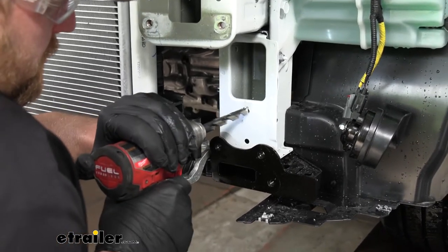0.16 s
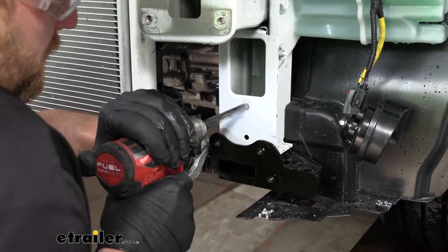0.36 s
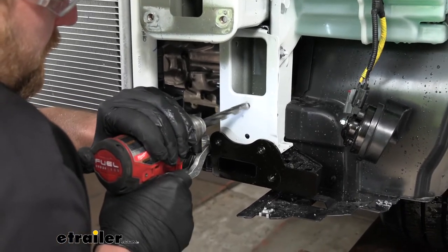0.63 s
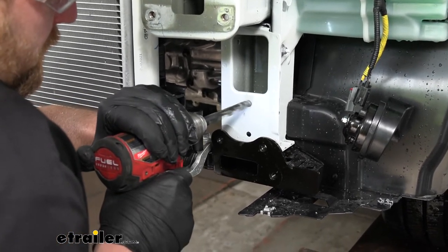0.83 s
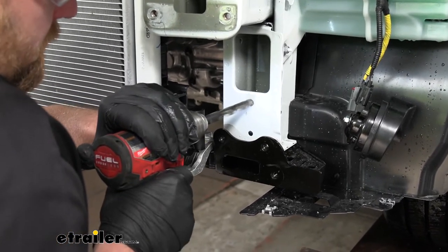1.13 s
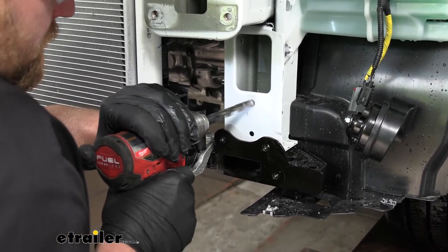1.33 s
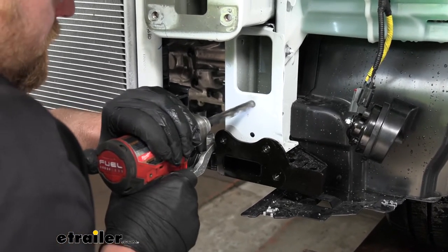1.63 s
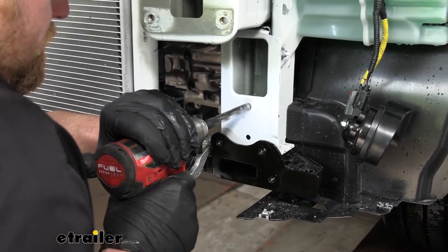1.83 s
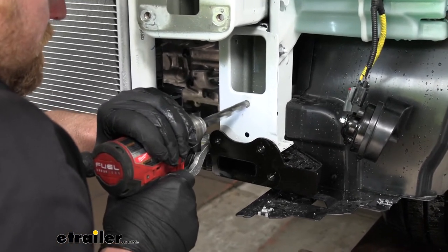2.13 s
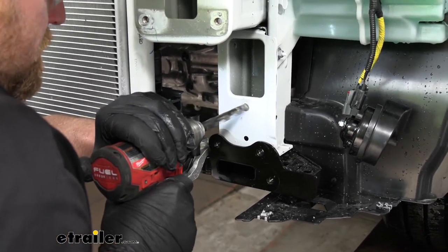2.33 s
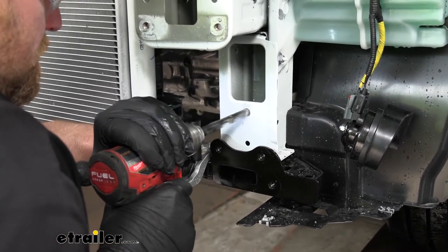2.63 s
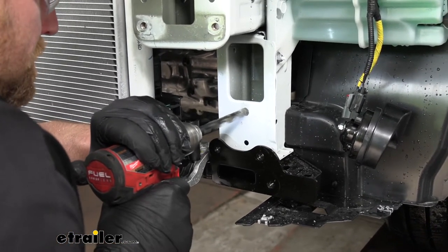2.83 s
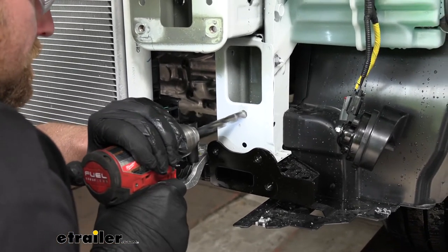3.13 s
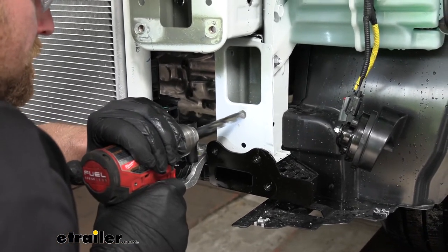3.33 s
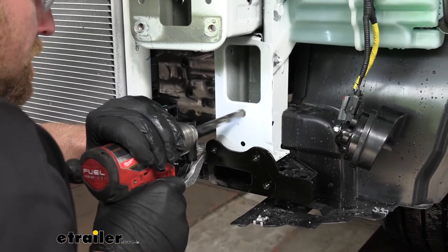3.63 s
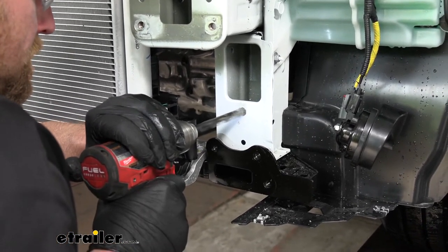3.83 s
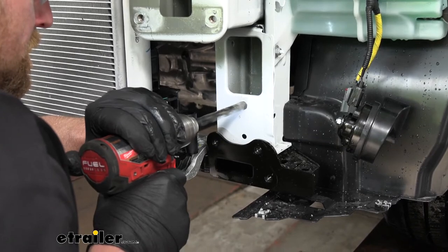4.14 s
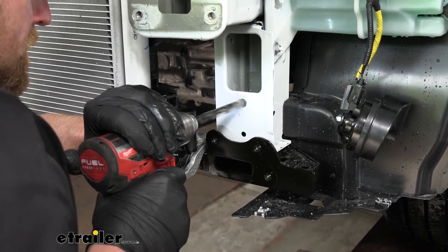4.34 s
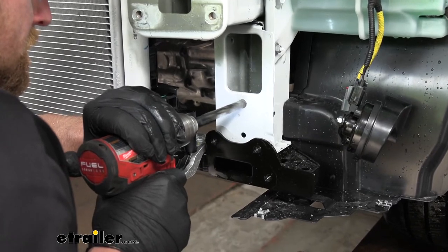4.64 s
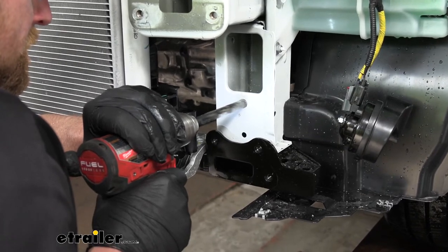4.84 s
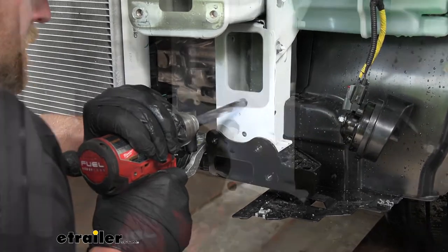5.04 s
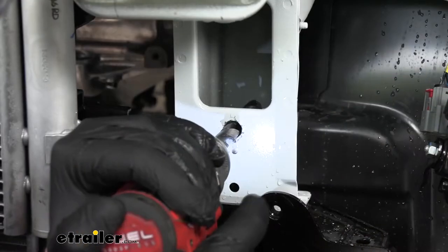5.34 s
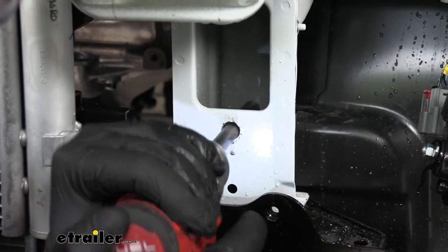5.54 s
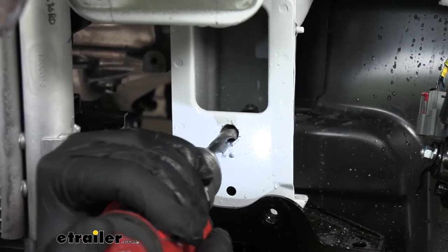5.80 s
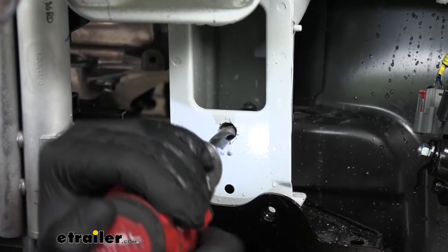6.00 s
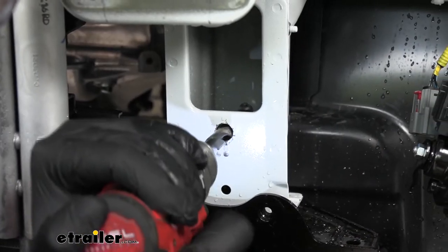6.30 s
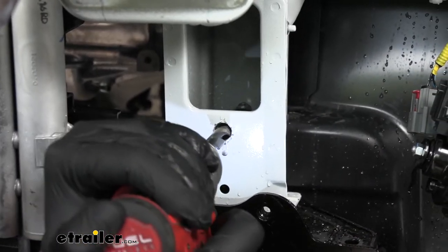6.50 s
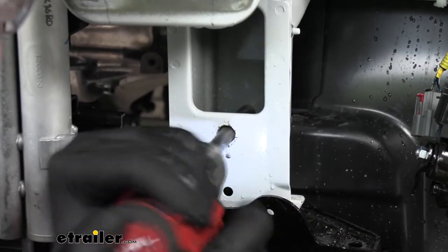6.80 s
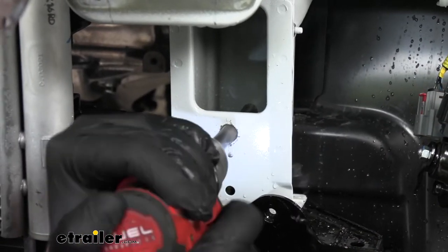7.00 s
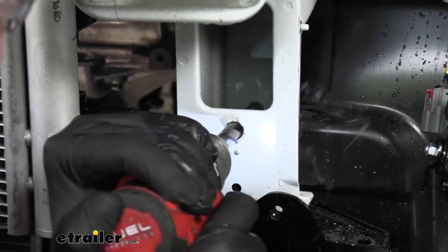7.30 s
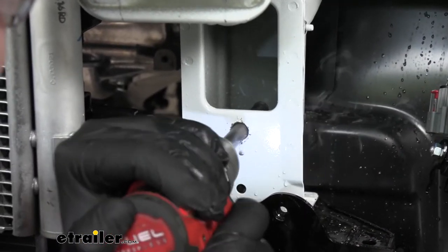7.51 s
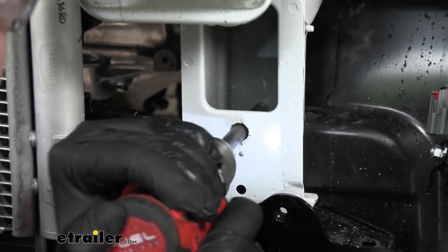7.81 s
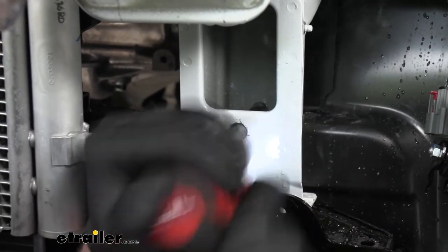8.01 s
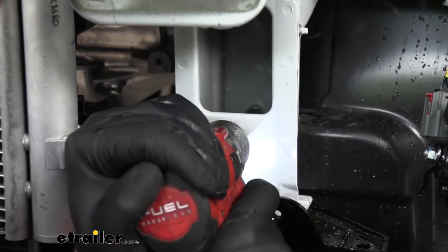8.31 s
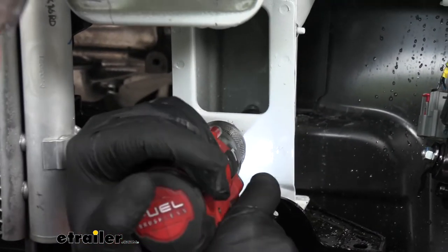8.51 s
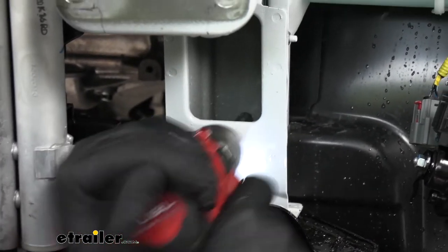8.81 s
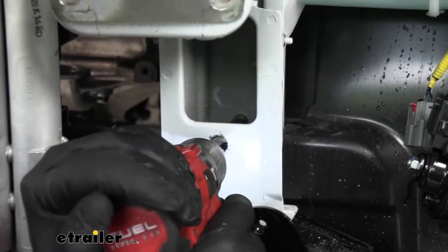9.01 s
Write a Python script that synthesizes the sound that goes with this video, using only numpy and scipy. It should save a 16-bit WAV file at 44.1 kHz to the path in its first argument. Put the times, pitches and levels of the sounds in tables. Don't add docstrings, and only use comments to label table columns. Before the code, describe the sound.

Steel drilling with a handheld electric drill. First a brief buzz, then over four seconds of rough, shrill boring with irregular metallic catches and a thin high electronic singing. After an abrupt change to a close microphone, the bit bites violently, knocks and scrapes the hole rim, pauses among small ticks, then jerks through four short bursts with clanks, gear clicks and crackling gloves, over quiet workshop air.

```python
import sys
import numpy as np
from scipy import signal
from scipy.fft import rfft, irfft
from scipy.io import wavfile
from scipy.ndimage import uniform_filter1d

SR = 44100
rng = np.random.default_rng(int(sys.argv[2]) if len(sys.argv) > 2 else 0)


def volts_from_decibels(level):
    exponent = np.asarray(level, float) / 20
    return 10 ** exponent


def to_wav(s):
    ch = np.atleast_2d(s).T
    pcm = np.round(np.clip(ch, -1, 1) * 32767)
    wavfile.write(sys.argv[1], SR, pcm.astype(np.int16))


N = 403515
T = np.arange(N) / SR
MOVE_S = 5.46
MOVE = int(MOVE_S * SR)
AFAR = T < MOVE_S

# bit bites t/s, lets go t/s, gear and chip noise at the bite level/dB, settled level/dB,
# coast-down dB/s
CUTS = [
    (-.3, -.02, -31, -33, 200),
    (.263, .49, -12, -16, 90),
    (.702, 5.24, -14, -21, 40),
    (5.525, 5.67, -3, -24, 480),
    (6.782, 7.18, -5.5, -25, 80),
    (7.488, 7.632, -14, -23, 300),
    (7.85, 8.172, -15.5, -27, 800),
    (8.812, 9.04, -16.5, -26, 150),
]
# t/s, peak level/dB, f/Hz
CATCHES = [(0.9455, -9, 3550), (1.162, -12, 3710), (1.374, -13, 3740), (1.4868, -14, 3110),
           (1.5237, -12, 3800), (1.5791, -11, 3610), (1.6205, -13, 3590), (1.6544, -12, 3630),
           (1.809, -13, 3730), (1.9248, -12, 3710), (2.056, -12, 3770), (2.1049, -12, 3690),
           (2.2166, -15, 3690), (2.26, -11, 3170), (2.3269, -7, 3420), (2.4586, -12, 3170),
           (2.5962, -12, 3700), (2.6546, -12, 3530), (2.719, -13, 3670), (2.8741, -12, 3680),
           (2.9031, -13, 3450), (3.2448, -12, 3780), (3.4503, -14, 3800), (3.5206, -9, 3420),
           (3.6479, -14, 3750), (3.7831, -10, 3750), (3.8364, -13, 3180), (3.8654, -14, 3320),
           (3.9312, -7, 3410), (4.0295, -10, 3590), (4.0794, -11, 3430), (4.1293, -9, 3600),
           (4.1816, -13, 3730), (4.2305, -12, 3090), (4.2929, -14, 3730), (4.3298, -7, 3690),
           (4.5079, -9, 3480), (4.6032, -12, 3770), (4.6361, -9, 3110), (4.674, -10, 3590),
           (4.7104, -9, 3720), (4.7613, -9, 3750), (4.8137, -12, 3580), (4.8406, -8, 3710),
           (4.915, -11, 3690), (4.9424, -10, 3780), (5.0172, -8, 3490), (5.0547, -14, 3740),
           (5.1001, -12, 3110), (5.1973, -13, 3690)]


def unit(x):
    return x / np.sqrt(np.mean(x ** 2))


def noise():
    return rng.standard_normal(N)


def walk(rate):
    steps = rng.standard_normal(int(4 * rate * N / SR) + 9)
    smooth = 2.4 * uniform_filter1d(uniform_filter1d(steps, size=4), size=4)
    return np.interp(T, np.arange(len(steps)) / (4 * rate), smooth)


def colour(x, shape, peaks=(), lo_hz=1., hi_hz=30000.):
    f = np.arange(4097) * SR / 8192 + 1
    shape_hz, shape_db = np.transpose(shape)
    db = np.interp(np.log(f), np.log(shape_hz), shape_db)
    for hz, width, rise_db in peaks:
        db = db + 10 * np.log10(1 + (volts_from_decibels(rise_db) ** 2 - 1) / (1 + (2 * (f - hz) / width) ** 2))
    db = db - 10 * np.log10((1 + (lo_hz / f) ** 8) * (1 + (f / hi_hz) ** 8))
    cep = irfft(db * np.log(10) / 20)
    cep = np.r_[cep[0], 2 * cep[1:4096], np.zeros(4096)]
    response = irfft(np.exp(rfft(cep)))[:4096]
    return unit(signal.oaconvolve(x, response)[:len(x)])


def grit(count, rate, scatter_db, smooth):
    hit = rng.random(count) < rate / SR
    size = rng.exponential(size=count)
    hits = hit * rng.standard_normal(count) * volts_from_decibels(scatter_db * np.minimum(size, 4))
    return unit(unit(hits) + smooth * rng.standard_normal(count))


def add(out, s, sound):
    i = int(s * SR)
    out[i:i + len(sound)] += sound[:N - i]


def spans(rows, soft):
    gain = np.zeros(N)
    for on, off, db0, db1 in rows:
        part = slice(int(on * SR), int(off * SR))
        gain[part] = volts_from_decibels(np.linspace(db0, db1, len(gain[part])))
    return uniform_filter1d(gain, int(soft * SR))


def swell(t, rise, t60):
    attack = np.sin(np.pi / 2 * np.minimum(t / rise, 1)) ** 2
    return attack * volts_from_decibels(-60 * np.maximum(t - rise, 0) / max(t60, .005))


def tones(phase, orders, wobble_db, rate, tilt_db=0):
    return sum(volts_from_decibels(db + tilt_db * np.log2(k / 4) + wobble_db * walk(rate)) * np.sin(k * phase + k * k)
               for k, db in orders)


def shop():
    # f/Hz, level/dB per Hz
    air_afar = [(18, -37.5), (30, -8.5), (198, -6), (391, -15.5), (508, -22), (677, -12.5), (814, -24),
                (1740, -23), (2710, -28), (9800, -40.5), (15700, -62)]
    air_close = [(18, -39), (30, -14), (111, -0.5), (208, -8.5), (293, -5), (343, -14), (457, -9),
                 (594, -14.5), (8370, -36), (13800, -35), (15700, -44)]
    air = noise() * volts_from_decibels(1.0 * walk(4.08))
    return np.r_[volts_from_decibels(-45) * colour(air[:MOVE], air_afar), volts_from_decibels(-46.5) * colour(air[MOVE:], air_close)]


def room(x):
    t = T[:SR // 2]
    dull = uniform_filter1d(rng.standard_normal(len(t)), size=6) * volts_from_decibels(-60 * t / 0.81)
    bright = rng.standard_normal(len(t)) * volts_from_decibels(-4.0 - 60 * t / .5)
    tail = (dull + bright) * (t > .008)
    return signal.oaconvolve(x, tail / np.sqrt(np.sum(tail ** 2)))[:N]


def rustle():
    crackle_spans = [(.52, .577, -39, -39), (.577, .7, -60, -62), (5.53, 5.56, -40, -32),
                     (5.56, 5.68, -29, -27), (6.78, 6.95, -38, -36), (6.95, 7.15, -32, -34),
                     (7.15, 7.34, -41, -48), (7.5, 7.65, -41, -39), (7.9, 8.1, -40, -42),
                     (8.95, 9.1, -38, -36), (5.68, 6.02, -56, -62), (6.04, 6.16, -61, -62),
                     (6.36, 6.6, -64, -66), (8.38, 8.42, -62, -62), (8.48, 8.62, -62, -66)]
    grains = grit(N, 900, 3.0, .8) * volts_from_decibels(3.5 * walk(40))
    crackle = colour(grains, [(3000, -14), (9000, -12), (12500, -9), (14000, 0)], (), 4000.)
    return spans(crackle_spans, .02) * crackle


def clicks():
    # t/s, peak level/dB, from f/Hz, to f/Hz
    chips = [(.023, -30, 1500, 13000), (.165, -38, 4500, 15500), (.575, -30, 3000, 15000),
             (5.383, -40, 12500, 15500), (5.467, -20, 6000, 15500), (5.483, -21, 400, 4500),
             (5.612, -20, 12500, 15500), (5.667, -10, 1500, 9000), (5.749, -32, 11000, 15500),
             (6.087, -44, 1500, 9500), (6.129, -42, 3000, 7000), (6.167, -44, 1500, 4500),
             (6.235, -20, 1350, 1950), (6.236, -36, 3000, 15000), (6.499, -50, 4000, 15500),
             (6.513, -40, 4000, 15500), (6.54, -52, 9000, 15000), (6.585, -48, 4000, 15000),
             (6.677, -38, 6000, 15500), (6.742, -46, 10000, 15500), (6.798, -28, 8000, 15500),
             (6.86, -16, 5000, 14000), (6.942, -13, 4000, 13000), (6.995, -11, 4000, 15500),
             (7.002, -13, 4000, 15500), (7.016, -10, 4000, 15000), (7.031, -7, 4000, 15000),
             (7.081, -12, 4500, 15500), (7.087, -15, 9000, 15500), (7.105, -20, 10000, 15500),
             (7.113, -15, 4500, 15500), (7.215, -18, 4000, 12000), (7.378, -42, 12000, 15500),
             (7.64, -17, 4000, 15000), (7.92, -16, 4000, 12000), (7.957, -16, 4000, 13000),
             (7.996, -17, 4000, 11000), (8.158, -24, 11000, 15500), (8.276, -12, 1400, 2300),
             (8.277, -26, 2500, 15500), (8.284, -24, 150, 1500), (8.752, -34, 1500, 15500),
             (8.762, -11, 1500, 8000), (8.765, -26, 40, 300), (8.89, -16, 60, 900),
             (8.895, -17, 4000, 10000), (9.0, -18, 3000, 15000), (9.044, -16, 3500, 14000),
             (9.072, -22, 9000, 15500), (9.085, -20, 2000, 15000)]
    # t/s, peak level/dB
    cogs = [(.265, -22), (.273, -15), (.278, -12), (.705, -21), (.718, -14), (5.523, -28), (5.535, -26),
            (6.781, -28), (6.787, -27), (6.797, -15), (7.385, -36), (7.47, -33), (7.478, -32), (7.486, -26),
            (7.506, -16), (7.858, -25), (8.813, -30), (8.822, -25)]
    # from f/Hz, to f/Hz
    cog_band = (3000, 4600)
    out = np.zeros(N)
    t = T[:4096]
    f = np.arange(2049) * SR / 4096 + 1
    for s, db, lo_hz, hi_hz in [*chips, *[(*cog, *cog_band) for cog in cogs]]:
        slopes = np.sqrt((1 + (lo_hz / f) ** 6) * (1 + (f / hi_hz) ** 6))
        puff = unit(irfft(rfft(rng.standard_normal(len(t))) / slopes))
        slow = 1 + 300 / lo_hz
        add(out, s - .0015, volts_from_decibels(db - 5.0) * puff * swell(t, .0018 * slow, .016 * slow))
    return out


def edge_catches():
    out = np.zeros(N)
    t = T[:3000]
    for s, db, hz in CATCHES:
        ring = np.sin(2 * np.pi * hz * t) + .45 * np.sin(2 * np.pi * (6900 - hz) * t)
        ring = ring + .3 * np.sin(2 * np.pi * 1550 * t) + 0.076 * rng.standard_normal(len(t))
        add(out, s - .001, volts_from_decibels(db - 4.0) * swell(t, 0.0025, 0.027) * ring)
    return out


def knocks_in_hole():
    # from t/s, to t/s, start level/dB, end level/dB
    rubs = [
        (5.62, 5.69, -25, -23),
        (5.69, 5.94, -22, -54),
        (5.94, 6.06, -44, -50),
        (6.385, 6.42, -50, -53),
        (6.632, 6.66, -23, -38),
        (6.665, 6.74, -22, -46),
        (8.2, 8.3, -39, -40),
        (8.72, 8.82, -38, -39),
        (8.91, 9.0, -21, -18),
    ]
    # t/s, peak level/dB, f/Hz, treble above it level/dB
    ticks = [(5.466, -30, 2600, -5), (5.749, -22, 1325, -8), (6.39, -39.5, 1060, -18),
             (6.631, -17, 1070, -7), (6.669, -19, 1063, -11), (6.701, -13, 1080, -11),
             (8.722, -30, 1440, -25), (8.743, -24, 1275, -25), (8.761, -12, 1904, -15)]
    snags = [(5.553, -12, 520, -12), (5.561, -10, 1300, -10), (5.578, -12, 4100, -12),
             (5.592, -11, 4150, -12), (5.598, -11, 1250, -12), (5.613, -12, 2900, -10),
             (5.643, -7, 1100, -13), (5.647, -10, 600, -13), (5.651, -12, 3550, -12),
             (5.665, -11, 2300, -13), (5.676, -14, 4000, -10), (6.875, -9, 3500, -10),
             (6.92, -8, 1100, -12), (6.965, -8, 1250, -10), (6.81, -8, 1182, -12), (6.858, -1.5, 686, -13),
             (6.944, -1.5, 1050, -8.5), (6.997, -11.5, 2076, -5), (7.016, -7, 732, -9),
             (7.029, -14, 1490, -8), (7.082, -8, 1463, -8), (7.174, -3.5, 1670, -14), (7.218, -9, 1380, -7),
             (7.539, -5.5, 1603, 1.5), (7.644, -18.5, 917, -5), (7.918, -9.5, 1528, -5),
             (7.955, -6, 626, -12), (8.051, -9, 1055, -12), (8.823, -18, 1640, -12),
             (8.888, -1.5, 1864, -20), (8.915, -9, 1490, -16), (8.929, -7, 1250, -13),
             (8.946, -6.5, 1510, -12), (8.965, -9, 1480, -14), (8.979, -9.5, 1480, -13),
             (9.02, -12, 1300, -14)]
    # f/Hz, width f/Hz, level/dB
    modes = [(600, 25, 12), (933, 20, 16), (1047, 24, 17), (1263, 30, 16), (2140, 22, 9), (3330, 80, 6.6),
             (5790, 30, 5.5)]
    out = np.zeros(N)
    frame = spans(rubs, 0.0089) * noise() * volts_from_decibels(3.0 * walk(70))
    t = T[:3000]
    for s, db, hz, treble_db, t60 in [*[(*r, .032) for r in ticks], *[(*r, .038) for r in snags]]:
        hiss = rng.standard_normal((3, len(t)))
        rough = 1 + 0.89 * unit(uniform_filter1d(hiss[2], size=40))
        ring = rough * np.sin(2 * np.pi * hz * t) + .8 * uniform_filter1d(hiss[0], size=7)
        ring = ring * swell(t, 0.0021, t60)
        soft_hiss = uniform_filter1d(uniform_filter1d(hiss[1], size=5), size=3)
        crack = unit(np.diff(soft_hiss, prepend=0) + 0.05 * hiss[1])
        crack = crack * volts_from_decibels(treble_db - 2.0) * swell(t, 0.0029, 0.7 * t60)
        add(out, s - .001, volts_from_decibels(db - 5.5) * (ring + crack))
        add(frame, s, volts_from_decibels(db - 16) * hiss[0] * swell(t, .002, 0.027))
    return out + np.std(frame) * colour(frame, NEAR, modes, 370.0, 3500.0)


# f/Hz, level/dB per Hz
NEAR = [(18, -43), (30, -19), (160, -14), (317, -15), (495, -6.5), (772, -8), (1410, -2.5), (1980, -10.5),
        (3350, -11), (5600, .5), (7400, -7.5), (8600, -16), (14100, -15.5), (15700, -23.5)]


def switching(phase, speed):
    # on t/s, off t/s, tone at the start level/dB, at the end level/dB
    trigger = [(0, .13, -60, -66), (.233, .55, -45, -45), (.693, 3.75, -42, -44), (3.75, 5.25, -47, -49),
               (5.25, 5.43, -55, -64), (5.517, 5.62, -45, -46), (6.773, 6.87, -44, -40),
               (7.25, 7.39, -58, -60), (7.39, 7.5, -50, -46), (7.838, 7.9, -53, -50),
               (8.81, 8.87, -50, -47)]
    carrier = 2 * np.pi * (9901 * T + np.cumsum(2.5 * walk(34)) / SR)
    upper = volts_from_decibels(-2.5 + 2.5 * walk(60)) * np.sin(carrier + phase)
    lower = volts_from_decibels(-6.0 + 2.5 * walk(60)) * np.sin(carrier - phase)
    sides = (upper + lower) * np.clip(speed / 550, 0, 1) * np.where(AFAR, 1, volts_from_decibels(-10.0))
    return spans(trigger, .02) * volts_from_decibels(6.5 + 0.92 * walk(30)) * (np.sin(carrier) + sides)


def chatter():
    puffs = noise() * volts_from_decibels(4.7 * np.minimum(walk(140), 2) + 1.4 * walk(20))
    bending = [(3670, 280, 13), (3320, 520, 8.5), (1540, 120, 15.6)]  # f/Hz, width f/Hz, level/dB
    return colour(puffs, [(20, 0.0015), (20000, 0)], bending, 1300., 4300.)


def cutting(turn):
    edges = [20, 250, 2500, 7000, 16000]
    # f/Hz, level/dB per Hz
    far = [(18, -44), (30, -12), (60, -14), (360, -8.5), (580, -5.5), (980, -6.5), (1500, -7.5),
           (1930, -12.5), (2640, -14), (3700, -6.5), (5500, -5.5), (6800, -5), (9000, -11.5),
           (15700, -19.5)]
    # f/Hz, width f/Hz, level/dB
    far_peaks = [(1615, 190, 8.5), (3110, 400, 5.5), (3710, 280, 6), (7950, 280, 9), (151, 44, 7.5),
                 (4930, 210, 1.5), (12800, 1800, -7), (2450, 140, -6.5)]
    near_peaks = [(600, 110, 3.7), (937, 13, 2.6), (1093, 10, 6.1), (1269, 10, 3.3), (1570, 190, 1.8),
                  (2122, 40, 5.3), (3380, 830, 9), (4240, 200, 6.7), (6250, 80, 1.3)]
    lips = np.cos(2 * turn) + 0.66 * np.cos(turn + 1.0)
    drive = np.r_[grit(MOVE, 6000, 1.2, 1.6), grit(N - MOVE, 2200, 2.7, 1.15)]
    layers = []
    swings = [(0.25, 0.49), (0.91, 1.08), (0.83, 0.82), (0.41, 0.51)]
    for lo, hi, (turn_db, flicker_db) in zip(edges[:-1], edges[1:], swings):
        x = drive * volts_from_decibels(turn_db * lips + flicker_db * walk(45) * np.where(AFAR, 1, 2.3))
        layers.append(np.r_[colour(x[:MOVE], far, far_peaks, lo, hi), colour(x[MOVE:], NEAR, near_peaks, lo, hi)])
    return layers


def effort():
    # frame ring level/dB,
    # fan air level/dB, spindle shake level/dB
    bracing = [(-47, 4, -8, 0), (-43, -3.5, -2.5, -14), (-60, -3.5, -2.5, -16), (-43, -1, -10, -21),
               (-31, .5, -4.5, -14), (-32, 1, -4.5, -14), (-34, 1.5, -4, -11), (-45, -.5, -3.5, -21)]
    # spin-up t/s, bite easing off t/s, braking dB/s^2, shudder above the gear noise level/dB
    pace = [(.017, .2, 270, -5), (.015, .2, 1300, -9), (.017, .2, 450, -4.5), (.022, .09, 10, -9),
            (.045, .22, 10, -9), (.02, .2, 10, -9), (.03, .2, 10, -9), (.035, .2, 10, -9)]
    t = T[::32]
    out = np.zeros((5, len(t)))
    for (on, off, bite_db, hold_db, coast), (rattle_db, *rel_db), (rise, settle, brake, shudder_db) in zip(
            CUTS, bracing, pace):
        since, after = np.maximum(t - on, 0), np.maximum(t - off, 0)
        held_db = hold_db + (bite_db - hold_db) * np.exp(-since / settle) - 25 * np.exp(-since / rise)
        coasting_db = held_db - coast * after - brake * after ** 2
        slack_db = np.where(t > off, rattle_db - 62 * after, -99)
        db = np.maximum(coasting_db, slack_db)
        audible = (t > on) * ((t > MOVE_S) == (on > MOVE_S))
        out = np.maximum(out, volts_from_decibels(db + np.c_[[0, *rel_db, shudder_db]]) * audible)
    out = uniform_filter1d(out, size=6)
    return [np.interp(T - lag, t, gain) for gain, lag in zip(out, (0, .008, 0, 0, 0))]


def motor():
    # t/s, commutation f/Hz, whine above the gear noise level/dB
    burst = [
        (.27, 100, -21),
        (.295, 375, -9),
        (.325, 880, -3),
        (.341, 1012, -4),
        (.356, 955, -6),
        (.41, 985, -6),
        (.437, 935, -6),
        (.47, 960, -6),
        (.5, 740, -19),
    ]
    run = [(.7, 60, -25), (.78, 720, -14), (.86, 769, -8), (.919, 680, -15), (1.1, 640, -13),
           (2.0, 606, -11.5), (3.0, 588, -10), (3.47, 582, -10), (3.72, 535, -8), (3.75, 650, -11),
           (3.8, 850, -10), (3.88, 851, -12), (3.95, 791, -13), (4.7, 758, -9.5), (5.3, 775, -10),
           (5.335, 560, -14), (5.449, 470, -25)]
    # t/s, gained f/Hz, whine gained level/dB, width t/s
    slips = [
        (5.55, -300, 0, .06),
        (5.6, 0, 17, .025),
        (6.86, 0, 7, .02),
        (7.0, 10, 9, .02),
        (7.542, 420, 22, .016),
        (7.917, 185, 24, .017),
        (8.112, 185, 17, .016),
        (8.865, -130, 0, .025),
        (8.89, 90, 20, .02),
    ]
    s, hz, db = np.transpose(burst + run)
    share, race_hz, race_db = np.zeros(N), 0, 0
    for on, off, *_ in CUTS:
        up = 1 - .85 * np.exp(-np.maximum(T - on, 0) / .032)
        share = np.maximum(share, (T > on) * up * np.exp(-np.maximum(T - off, 0) / .12))
    for at, gain_hz, gain_db, width in slips:
        race_hz = race_hz + gain_hz * np.exp(-((T - at) / width) ** 2)
        lean = np.where(T < at, 1.7 * width, .45 * width)
        race_db = race_db + gain_db * np.exp(-((T - at) / lean) ** 2)
    loaded_hz, loaded_whine_db = 790, -27
    speed = np.where(AFAR, np.interp(T, s, hz), np.maximum(loaded_hz * share, 100) + race_hz)
    return speed, np.where(AFAR, np.interp(T, s, db), loaded_whine_db + race_db)


def drill():
    # multiple of commutation, level/dB
    whine_afar = [(1, -13), (2, -1.5), (4, -1.5), (6, -13), (7, -12), (8, -1.5)]
    whine_close = [(2, -4), (4, 6), (6, -8), (7, -7)]
    # multiple of spindle turn, level/dB
    shake_orders = [(2, -12), (3, 3), (4, -8), (5, -9), (6, -9), (7, -3.5), (8, -6), (9, -5.5), (11, -3.5),
                    (13, -2), (16, -6.5)]
    # f/Hz, width f/Hz, level/dB
    housing = [(1950, 350, -9), (3650, 700, 6), (4900, 500, 2), (6100, 500, 3)]
    speed, whine_db = motor()
    phase = 2 * np.pi * np.cumsum(speed * (1 + .008 * walk(40))) / SR
    torsion = np.where(T < .95, .35, 1) * speed * (.016 * walk(150) + .011 * walk(18))
    mesh = phase + 2 * np.pi * np.cumsum(torsion) / SR
    turn = phase / 39
    gear, frame, fan, shake, bend = effort()
    low, mid, high, top = cutting(turn)
    shrill_db = 7.0 * (speed / 800 - 1)
    orders = np.where(AFAR, tones(mesh, whine_afar, 2.2, 100, shrill_db), tones(phase, whine_close, 1.6, 90))
    whine = volts_from_decibels(whine_db + 1.0) * np.std(orders) * colour(orders, [(20, 0), (20000, 0)], housing)
    shudder = volts_from_decibels(np.where(AFAR, shrill_db, 0)) * chatter()
    lines = np.where(AFAR, .95, .15)
    hum = colour(tones(turn, shake_orders, 1.5, 2.494), [(20, 0.0022), (400, 0)], [(140, 21, 7.9)])
    spindle = lines * hum + np.sqrt(1 - lines ** 2) * low
    cut = gear * (high + whine) + bend * shudder + frame * mid + fan * top + shake * spindle
    return cut + switching(phase, speed) + knocks_in_hole() + edge_catches() + clicks()


def scene():
    dry = drill()
    mono = dry + volts_from_decibels(-21.5) * room(dry) + shop() + rustle()
    return np.array([mono, mono])


def band_limit(x):
    return signal.sosfilt(signal.butter(12, 16670, fs=SR, output="sos"), x)


def record(dry):
    duck_db = np.zeros(N)
    for s, db, _ in CATCHES:
        add(duck_db, s + .008, max(db + 9.5, 0) * 1.86 * np.exp(-T[:SR // 2] / 0.073))
    steep = signal.ellip(10, .2, 60, 15820, fs=SR, output="sos")
    x = signal.sosfilt(steep, np.tanh(dry[0] * volts_from_decibels(-duck_db)))
    side = 0
    patch = 1400
    spells = rng.random(N // patch + 1) < .22
    for lo_hz in np.arange(8700., 15000., 1180.):
        band_pass = signal.butter(3, [lo_hz, lo_hz + 1180], "band", fs=SR, output="sos")
        band = signal.sosfiltfilt(band_pass, x)
        slipping = np.repeat(spells & (rng.random(len(spells)) < .33), patch)[:N]
        side = side + uniform_filter1d(0.73 * slipping, size=500) * band
    return band_limit(x - side + np.array([side, -side]))


dry = scene()
out = record(dry)
to_wav(out)
```